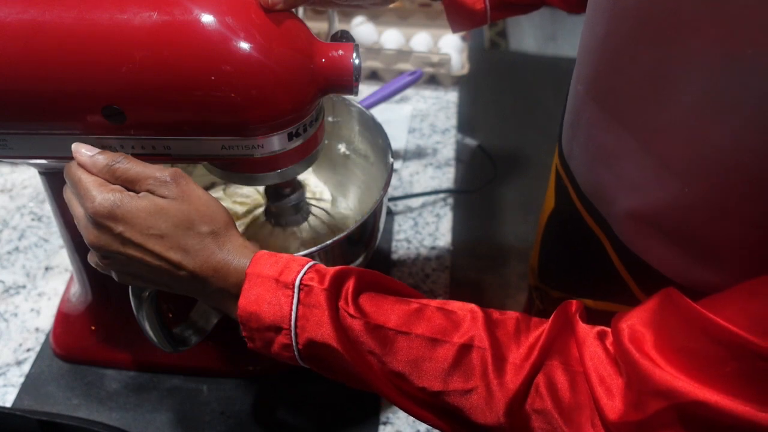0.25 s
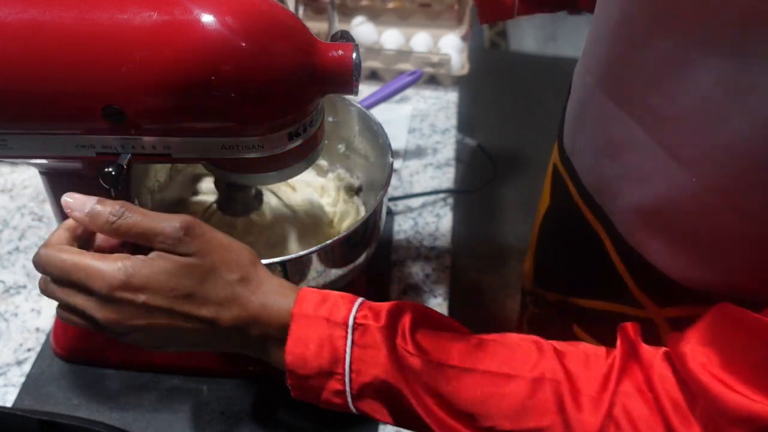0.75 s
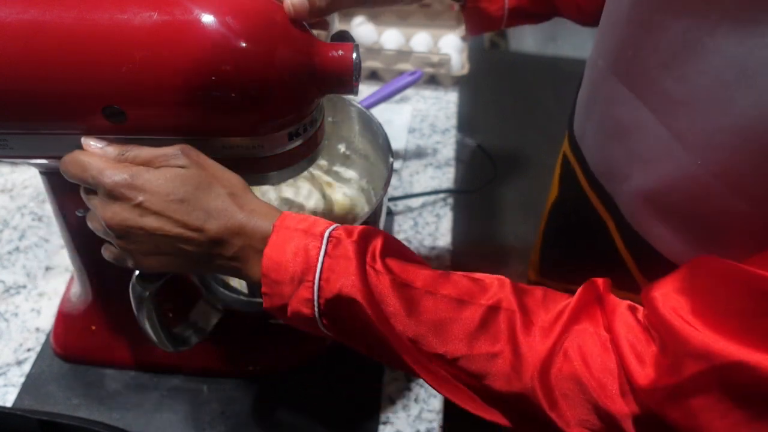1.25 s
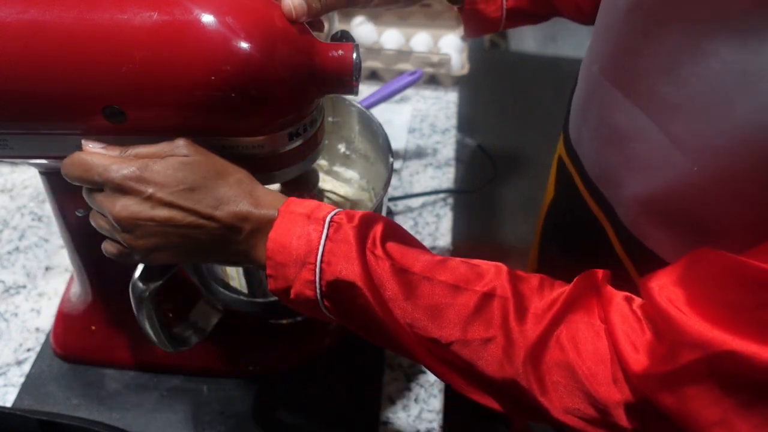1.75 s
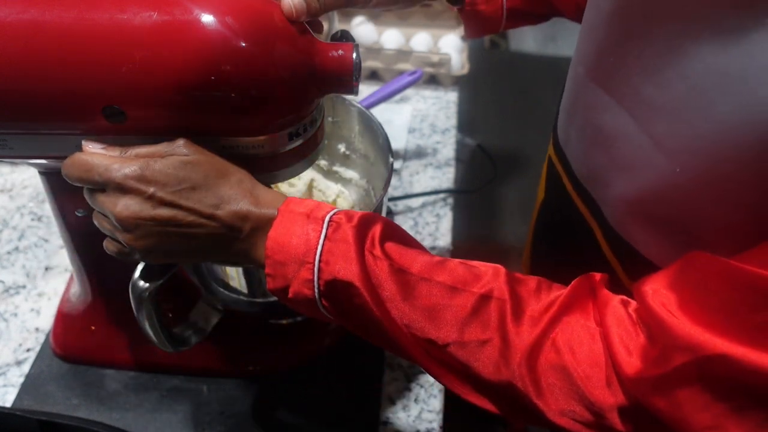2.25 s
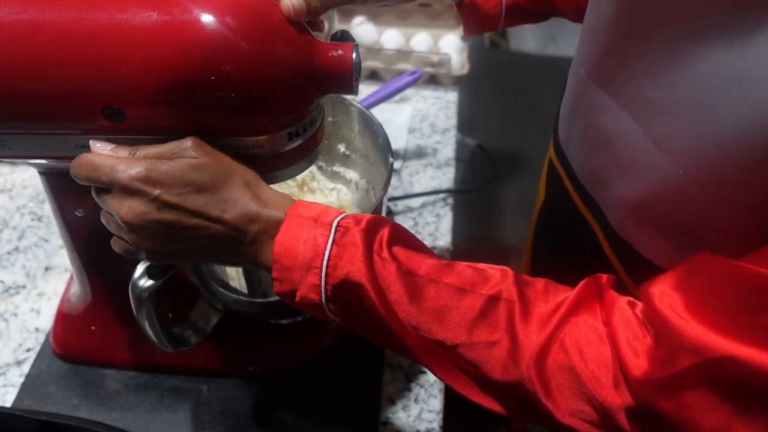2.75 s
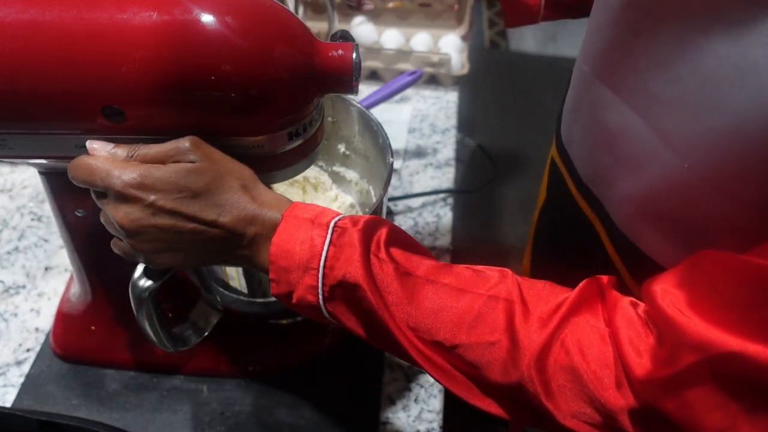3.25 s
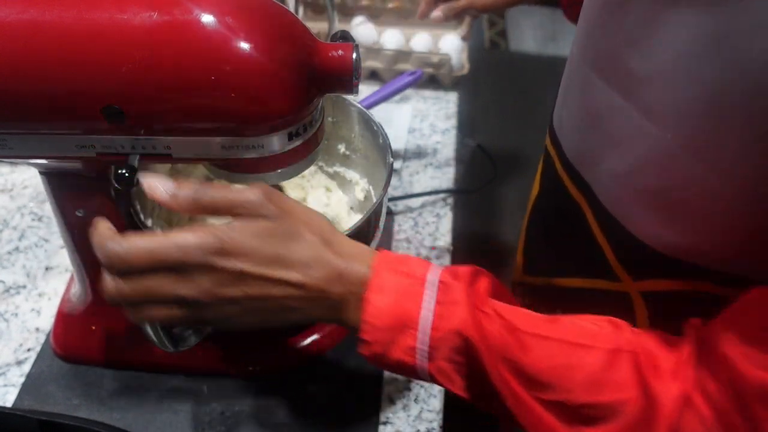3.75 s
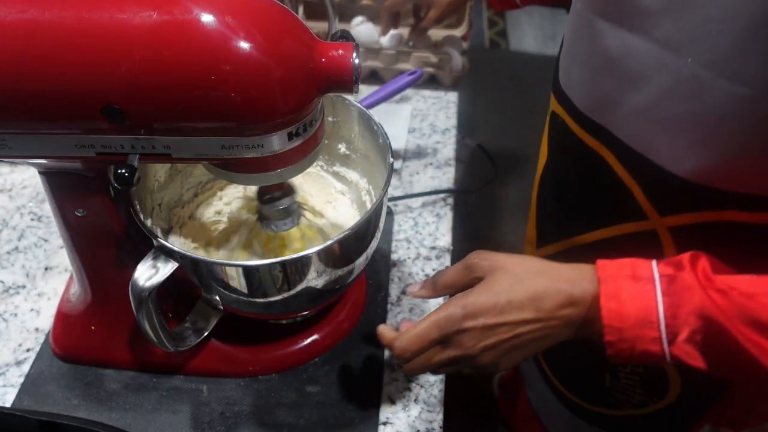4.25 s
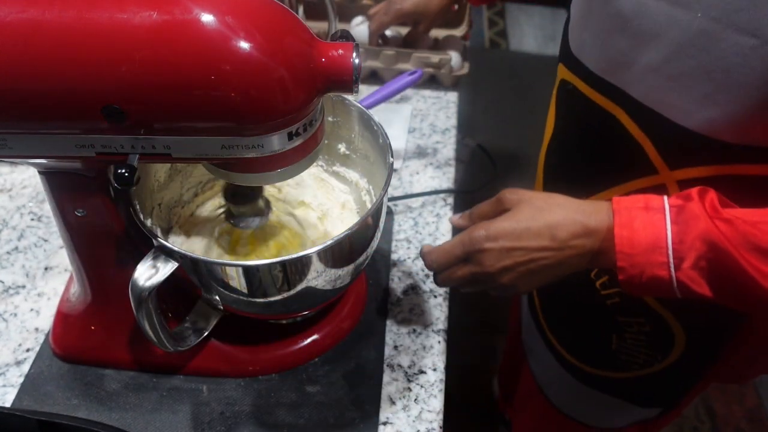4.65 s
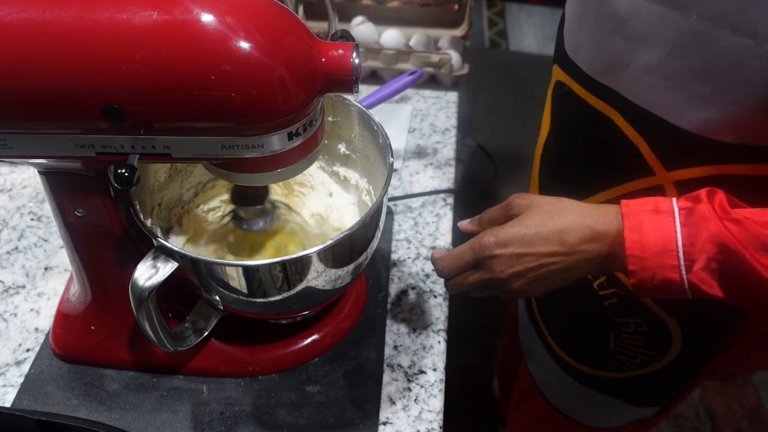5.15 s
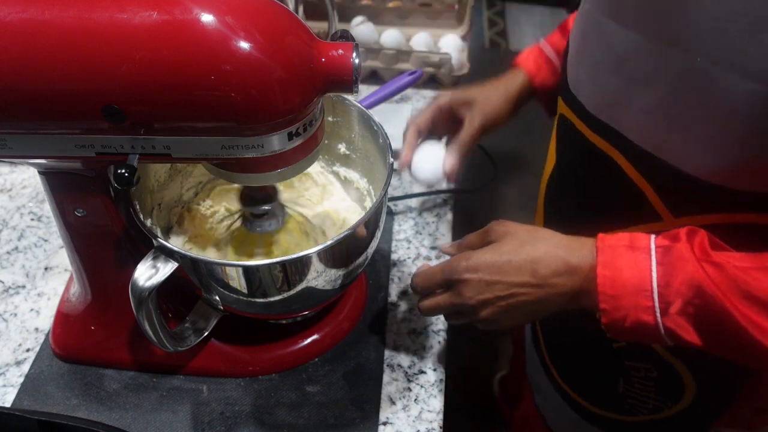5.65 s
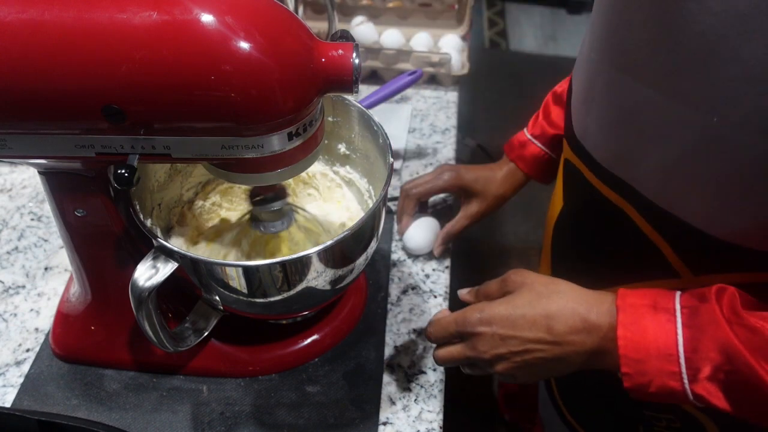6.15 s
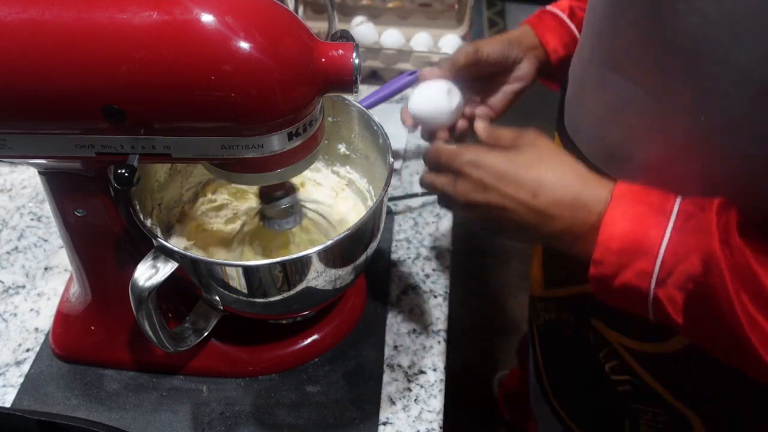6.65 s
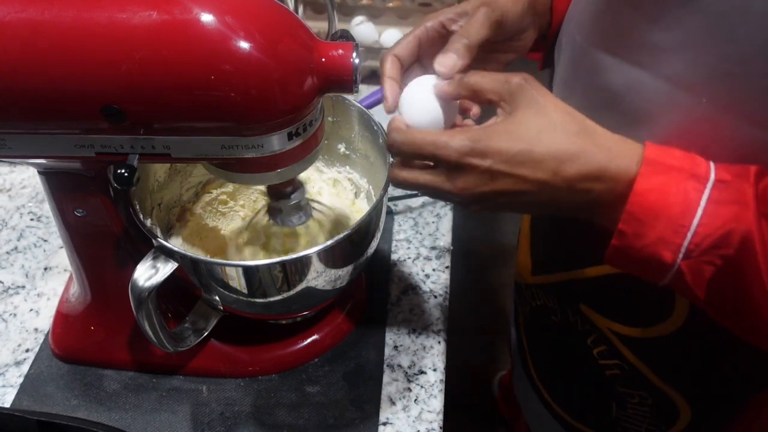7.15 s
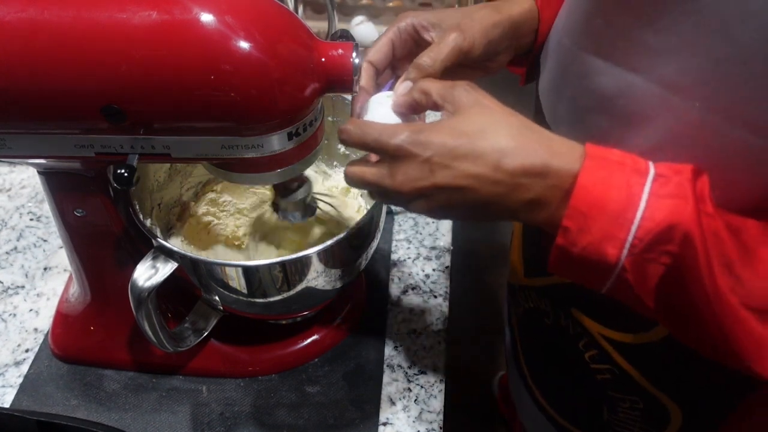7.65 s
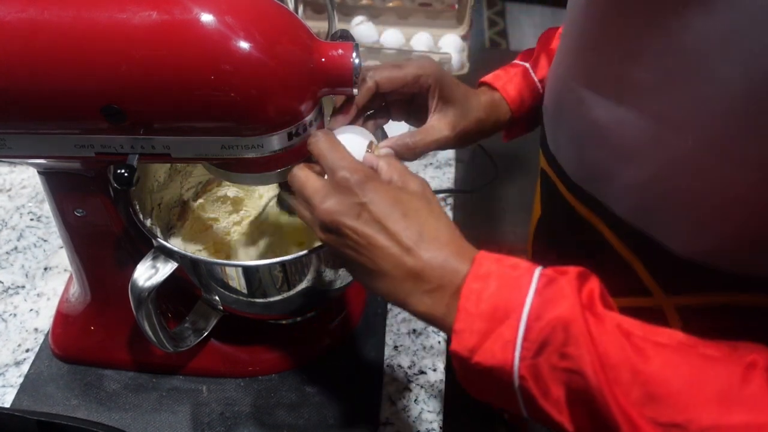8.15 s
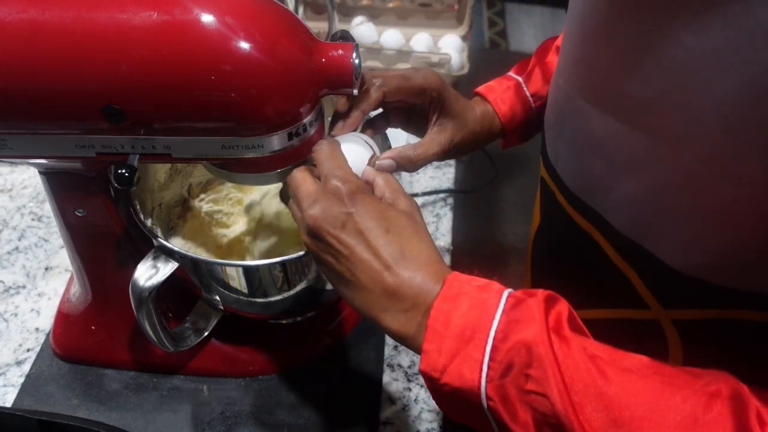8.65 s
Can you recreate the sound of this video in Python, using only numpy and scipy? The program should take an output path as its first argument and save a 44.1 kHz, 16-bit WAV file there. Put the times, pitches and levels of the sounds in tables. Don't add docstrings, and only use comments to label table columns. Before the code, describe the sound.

Heard close up, nearly centred, with small-room reflections: a kitchen mixer motor drones with a hissy, mains-pulsed buzz and soft table thumps. Small nudges raise its pitch, then a switch to fast sends the whine climbing abruptly to a louder, brighter whir. The pitch and loudness waver lumpily as batter drags. One crisp egg tap cuts through, followed later by a short, bright shell crack.

```python
import sys
import numpy as np
from scipy import signal
from scipy.fft import rfft, irfft, next_fast_len
from scipy.io import wavfile
from scipy.ndimage import uniform_filter1d

SR = 44100
rng = np.random.default_rng(int(sys.argv[2]) if len(sys.argv) > 2 else 0)


def attenuation_scalar(level_db):
    decades = np.asarray(level_db, float) / 20
    return 10 ** decades


def generate_wav(signal):
    frames = np.transpose(np.atleast_2d(signal))
    scaled = np.clip(frames, -1, 1) * 32767
    pcm = np.round(scaled).astype(np.int16)
    wavfile.write(sys.argv[1], SR, pcm)


N = 393147
LENGTH = next_fast_len(N, True)

# (pitch [Hz], level [dB per Hz])
EAR_NOISE = [(18, 2), (40, -1), (70, -15), (150, 4), (260, 1), (400, -23), (12000, -50), (15000, -30)]
# (pitch [Hz], difference [dB])
LEFT_OVER_RIGHT = [(60, -1), (450, 0.45), (1000, 2), (1600, 3), (2200, 0.1), (3500, 3.5), (8000, 3.5),
                   (15000, 4.5)]
# (pitch [Hz], side over middle [dB])
WALL_ECHO = [(30, -28), (400, -30), (800, -14), (1500, -19), (2200, -12), (4000, -27), (9000, -27),
             (14000, -13)]

# (time [s], level [dB], length [s])
SHAKES = [(0, -61, .15), (.5, -53, 0.19), (.85, -58, .25), (1.49, -59, 0.25), (2.08, -67, .15),
          (2.63, -60, .12), (2.95, -63.5, .18), (3.52, -65, .09), (4.42, -71, .15), (5.35, -70, .2),
          (5.9, -68, .2), (8.91, -69, .15)]
TABLE_DB = -76
# (time [s], snap [dB], ring [dB], ring pitch [Hz], time to fall 60 dB [s])
CLICKS = [(0.078, -43, -24.5, 6430, 0.021), (1.566, -30, -30, 3100, .02), (2.139, -40, -34, 6500, .02),
          (5.12, -37, -35, 4500, .02), (5.63, -56, -28, 1020, .08), (6.1328, -13, -22, 5600, 0.023),
          (6.138, -60, -38, 180, 0.11), (6.149, -43, -26, 1650, 0.092), (7.144, -40, -30, 3300, 0.035),
          (8.7962, -13.5, -15, 2900, 0.018), (8.829, -44.5, -46, 12000, .02)]

RIPPLE_HZ = 119.95
SLOW, FAST = 67, 99
IDLE_SPEED, OVERSHOOT = 49.4, .04
HUNT_SPEED = .12
# (time [s], speed gained [turns per s], time to the top [s])
LEVER = [
    (.062, 17.1, .2),
    (1.42, 3.6, .45),
    (2.02, 1.1, .25),
    (2.35, 28.85, .35),
]
# (time [s], drag [turns per s], lumpiness [0-1])
BATTER = [(0, -.3, 0), (.8, -.25, 0), (1, .05, 0), (2.8, -.15, .3), (3.4, -.05, .7), (3.75, .1, 0),
          (4.4, .1, 0), (4.85, 1.55, .2), (5.35, 1.25, .6), (5.65, .65, 1), (6.3, .95, 1), (7.1, .95, 1.2),
          (7.7, 1.35, .6), (8.92, 1.3, .8)]
GEARING, LUMP_SPEED = 47, .43
LIGHT_S = 6.6

# (time [s], hiss level [dB], looseness of the rattling parts [dB])
LOOSENESS = [(0, -39.5, -2), (.1, -36, -26), (.3, -37, -2), (.9, -35.5, -1.5), (1.1, -35.5, 0),
             (1.6, -37, 5.5), (2.2, -39, 5), (2.42, -38.5, -4), (2.62, -34, 5), (3.2, -35, -1),
             (6, -35, -3), (8.92, -35.5, -2)]
# (pitch [Hz], level [dB per Hz])
HISS_SLOW = [(18, -42), (40, -54), (120, -35.5), (250, -29), (330, -14.5), (800, -18), (1430, -20.5),
             (2000, -21.5), (2680, -31.5), (4200, -18.5), (5400, -22.5), (8080, -23.5), (11500, -28),
             (16000, -41.5)]
# (pitch [Hz], level [dB per Hz])
HISS_FAST = [(18, -51), (40, -45), (120, -27), (215, -22), (330, -6.5), (560, -11.5), (1000, -6),
             (1350, -13.5), (1900, -8), (2610, -13), (4200, -14.5), (5310, -18.5), (8000, -12.5),
             (16000, -30.5)]
# (multiple of the rate, width [Hz], when slow [dB], when fast [dB])
SLOT_HISS = [(2, 2800, -10, -20.5), (3, 990, -25, -9), (4, 690, -24, -24), (5, 480, -25, -19.5),
             (6, 640, -34, -22)]
# (pitch [Hz], width [Hz], when slow [dB], when fast [dB], share rung once a turn [0-1])
RATTLES = [(4600, 450, -15, -30, .97), (5050, 300, -12, -30, .97), (6150, 600, -10, -17, .1),
           (7250, 300, -16, -14, .3), (10400, 700, -10, -30, .97)]

DRONE_ORDERS = [(-1, 4), (-1, 5), (-1, 6), (-1, 7), (0, 1), (0, 2), (0, 3), (0, 4), (0, 6), (1, 2), (1, 3),
                (1, 5), (1, 6), (2, 2), (3, 1), (3, 2), (10, 0), (0, 3.5), (0, 6.5)]
# (when slow [dB], when fast [dB])
DRONE_DB = [(-39, -53.5), (-60, -50), (-54, -52), (-47.5, -53), (-67, -69.5), (-61.5, -65.5), (-49, -48),
            (-48, -46.5), (-47.5, -52), (-60, -48.5), (-37.5, -47), (-45, -44.5), (-44, -75), (-55, -47),
            (-55.5, -56.5), (-54, -75), (-45.5, -44), (-50.5, -49), (-45, -49.5)]
WHINE_ORDERS = [(21, 0), (21, 1), (22, -3), (22, -2), (22, -1), (22, 0), (22, 1), (22, 2), (23, -2),
                (23, -1), (23, 0)]
# (when slow [dB], when fast [dB])
WHINE_DB = [(-8, -18), (-26, -40.5), (-9, -25), (-2, -23.5), (-0.5, -14.5), (-7, -14), (0, -18.5), (0, -24),
            (-4, -53), (-16, -24.5), (-6, -38)]
OVERTONE_ORDERS = [(43, 0), (43, 1), (43, 2), (44, -2), (44, -1), (44, 0), (44, 1), (44, 2), (45, -1),
                   (45, 0), (66, 0), (66, 1), (67, 0), (88, 0)]
# (when slow [dB], when fast [dB])
OVERTONE_DB = [(-69, -68), (-69, -48), (-70, -69), (-49.5, -50), (-67, -53.5), (-44, -48), (-41.5, -40),
               (-64, -47.5), (-47, -44), (-49, -41.5), (-52, -45), (-42, -73), (-72, -53.5), (-43, -45)]
# (time [s], slot whine level [dB], overtone trim [dB])
EFFORT = [(0, -51, -8), (.08, -33.5, -6), (.13, -44, -7), (1.3, -46, -6.5), (2.3, -40.5, -6.5),
          (2.42, -21, -6.5), (2.515, -10.5, 2), (2.54, -20, -3), (2.575, -12.5, 1), (2.63, -25.5, -1.5),
          (3.75, -24, -2), (4.12, -29, -2), (4.6, -21.5, 0.2), (5.2, -22, -0.3), (5.42, -28, -1),
          (6.4, -21.5, 0.5), (7.25, -24.5, 0), (8.1, -22.5, 1)]
LUMP_WHINE_DB, LUMP_DRONE_DB = -1, 1.7
WHINE_LAG, DRONE_LAG = 0.87, 0.41
DRONE_SLOW_DB, DRONE_FAST_DB = -1.6, 0.04
FULL_SURGE = 150
DRONE_SURGE_DB, SURGE_LEAN_DB = 0.5, 5.5
# (pitch [Hz], width [Hz], level [dB])
HOUSING = [(338, 69, 4.5), (422, 19.2, 11), (456, 20, -40), (711.2, 18.8, 9), (757, 24.4, 8),
           (916, 25, 8.5), (1111, 39, 9.5), (1500, 47, 7), (2930, 23, 6.5), (2169, 39, 13.5)]


def evened(x):
    return x / np.sqrt(np.mean(x ** 2) + 1e-20)


def curve(rows):
    s, *columns = np.transpose(rows)
    return [np.interp(np.arange(N) / SR, s, c) for c in columns]


def shape(points):
    f, value = np.transpose(points)
    return np.interp(np.log(np.fft.rfftfreq(LENGTH, 1 / SR) + 1), np.log(f + 1), value)


def colour(x, gain):
    return irfft(rfft(x, LENGTH) * gain, LENGTH)[..., :N]


def wander(per_s):
    knots = rng.standard_normal(int(N / SR * per_s) + 2)
    return evened(np.interp(np.arange(N) / SR * per_s, np.arange(len(knots)), knots))


def resonate(x, hz, width):
    turn = np.exp(2j * np.pi * np.cumsum(hz * np.ones(len(x))) / SR)
    r = np.exp(-np.pi * width / SR)
    return 2 * (turn * signal.lfilter([1 - r], [1, -r], x / turn)).real


def between(slow_db, fast_db, fast):
    return slow_db + (fast_db - slow_db) * fast


def ear_noise(band):
    return attenuation_scalar(-63.0) * evened(colour(rng.standard_normal((2, N)), band * attenuation_scalar(shape(EAR_NOISE))))


def walls():
    taps = rng.standard_normal(4000) * attenuation_scalar(-60 * np.arange(4000) / SR / 0.043)
    return 1.4j * rfft(taps / np.linalg.norm(taps), LENGTH).imag * attenuation_scalar(shape(WALL_ECHO))


def table(ripple):
    t = np.arange(N) / SR
    power = attenuation_scalar(TABLE_DB) ** 2
    power = power + sum(attenuation_scalar(db) ** 2 * np.exp(-((t - s) / length) ** 2) for s, db, length in SHAKES)
    return np.sqrt(2 * power) * np.cos(ripple / 2)


def clicks():
    out, t = np.zeros(N + SR), np.arange(SR // 8) / SR
    bright = signal.butter(2, 3000, "high", fs=SR)
    for s, snap_db, ring_db, hz, t60 in CLICKS:
        noise = rng.standard_normal(len(t))
        snap = evened(signal.lfilter(*bright, noise))
        ring = evened(resonate(resonate(noise, hz, 0.22 * hz), hz, 0.22 * hz))
        fade = attenuation_scalar(-60 * np.maximum(t - .002, 0) / t60)
        fade = fade + attenuation_scalar(-17 - 60 * t / 0.17)
        attack = np.minimum(t * 9000, 1)
        out[round(s * SR):][:len(t)] += (attenuation_scalar(snap_db) * snap + attenuation_scalar(ring_db) * ring) * fade * attack
    return out[:N]


def motion():
    t = np.arange(N) / SR
    free = np.full(N, IDLE_SPEED)
    damp = -np.log(OVERSHOOT)
    for s, gain, top in LEVER:
        u = np.maximum(t - s, 0) / top
        swing = np.cos(np.pi * u) + damp / np.pi * np.sin(np.pi * u)
        free = free + gain * (1 - np.exp(-damp * u) * swing)
    drag, lumps = curve(BATTER)
    turns = np.cumsum(free - drag) / SR
    orbit = lumps * np.exp(2j * np.pi * (turns - turns[round(LIGHT_S * SR)]) / GEARING)
    hunting = HUNT_SPEED * uniform_filter1d(wander(6), size=4000)
    speed = free - drag + LUMP_SPEED * orbit.real + hunting
    return speed, np.gradient(free) * SR, orbit


def rattles(white, rotor, bar, pulse, fast, loose_db):
    new_turn = np.diff(rotor // (2 * np.pi), prepend=0)
    knock = 6 * new_turn * pulse * attenuation_scalar(1.3 * wander(70))
    out = np.zeros(N)
    for hz, width, slow_db, fast_db, once in RATTLES:
        once = np.clip(once, 0, 1)
        strength = .045 + pulse ** 2 * (1 - once + .4 * once * bar ** 5)
        ticks = white * strength + once * knock
        part = signal.butter(2, [hz - width / 2, hz + width / 2], "band", fs=SR)
        out += attenuation_scalar(loose_db + between(slow_db, fast_db, fast)) * evened(signal.lfilter(*part, ticks))
    return out


def hiss(speed, rotor, ripple, fast):
    white = rng.standard_normal(N)
    bar = np.exp(3 * (np.cos(rotor) - 1))
    pulse = np.exp(.9 * (np.cos(ripple) - 1))
    gated = white * evened((.9 + pulse) * (1 + (.8 - .55 * fast) * bar))
    bass = signal.butter(2, 900, fs=SR)
    low = signal.lfilter(*bass, white) * attenuation_scalar(0.82 * wander(30))
    mixed = low + gated - signal.lfilter(*bass, gated)
    slow_part = attenuation_scalar(1) * evened(colour(mixed, attenuation_scalar(shape(HISS_SLOW))))
    fast_part = attenuation_scalar(2.5) * evened(colour(mixed, attenuation_scalar(shape(HISS_FAST))))
    broad = np.sqrt(1 - fast) * slow_part + np.sqrt(fast) * fast_part
    for k, width, slow_db, fast_db in SLOT_HISS:
        slot_hz = k * 22 * speed
        band = resonate(resonate(gated, slot_hz, width), slot_hz, width)
        broad += attenuation_scalar(between(slow_db, fast_db, fast)) * evened(band)
    level_db, loose_db = curve(LOOSENESS)
    return attenuation_scalar(level_db) * (broad + rattles(white, rotor, bar, pulse, fast, loose_db))


def tones(orders, levels, rotor, ripple, fast, waver_db, lean_db=0, scatter=1):
    out = np.zeros(N)
    for (k, m), (slow_db, fast_db) in zip(orders, levels):
        level_db = between(slow_db, fast_db, fast) + waver_db * wander(9) - lean_db * abs(m - 1)
        start = 2 * np.pi * scatter * rng.random()
        out += np.sqrt(2) * attenuation_scalar(level_db) * np.cos(k * rotor + m * ripple + start)
    return out


def housing():
    hz = np.fft.rfftfreq(LENGTH, 1 / SR)
    return np.sqrt(1 + sum(attenuation_scalar(db) ** 2 / (1 + (2 * (hz - f) / width) ** 2) for f, width, db in HOUSING))


def mixer():
    speed, gaining, orbit = motion()
    surge = gaining / FULL_SURGE
    fast = np.clip((speed - SLOW) / (FAST - SLOW), 0, 1)
    rotor = 2 * np.pi * np.cumsum(speed + 0.041 * wander(60)) / SR
    ripple = 2 * np.pi * RIPPLE_HZ * np.arange(N) / SR

    whine_db, overtone_db = curve(EFFORT)
    whine_db = whine_db + LUMP_WHINE_DB * (orbit * np.exp(-1j * WHINE_LAG)).real
    drone_db = between(DRONE_SLOW_DB, DRONE_FAST_DB, fast) + DRONE_SURGE_DB * surge
    drone_db = drone_db + LUMP_DRONE_DB * (orbit * np.exp(-1j * DRONE_LAG)).real

    drone = tones(DRONE_ORDERS, DRONE_DB, rotor, ripple, fast, 1.77 + 0.48 * fast)
    whine = tones(WHINE_ORDERS, WHINE_DB, rotor, ripple, np.sqrt(fast), 1.2, SURGE_LEAN_DB * surge, .6)
    overtones = tones(OVERTONE_ORDERS, OVERTONE_DB, rotor, ripple, fast, 1.34)
    force = attenuation_scalar(drone_db) * drone + attenuation_scalar(whine_db) * whine + attenuation_scalar(overtone_db) * overtones
    force += hiss(speed, rotor, ripple, fast)
    return colour(force, housing()) + table(ripple)


def scene():
    near = mixer() + clicks()
    side = np.array([[1], [-1]])
    band = np.fft.rfftfreq(LENGTH, 1 / SR) < 15830
    ears = attenuation_scalar(side * shape(LEFT_OVER_RIGHT) / 2) + side * walls()
    return colour(near, band * ears) + ear_noise(band)


def top_cut(x):
    return signal.sosfilt(signal.butter(12, 16650, fs=SR, output="sos"), x)


def record(dry):
    treble = signal.lfilter(*signal.butter(2, 5000, "high", fs=SR), dry.mean(0))
    power_db = 10 * np.log10(uniform_filter1d(treble ** 2, 60) + 1e-12)
    fall = np.arange(N) * 420. / SR
    held_db = np.maximum.accumulate(power_db + fall) - fall
    over_db = np.maximum(held_db + 26, 0)
    ducked = dry / attenuation_scalar(.6 * uniform_filter1d(over_db, 100, origin=-49))
    return top_cut(ducked)


dry = scene()
out = record(dry)
generate_wav(out)
```